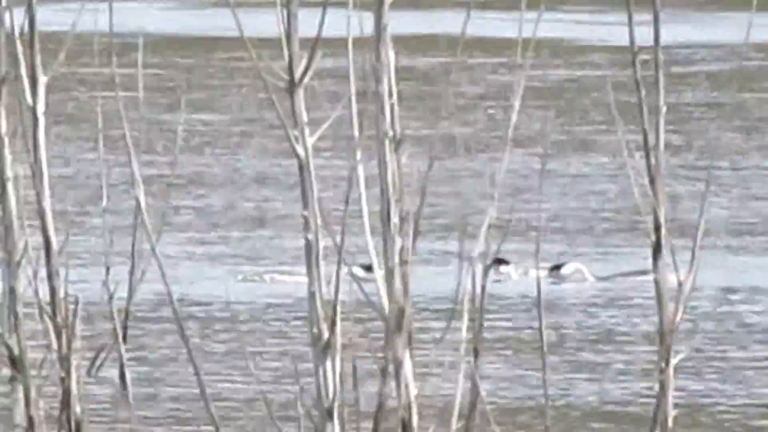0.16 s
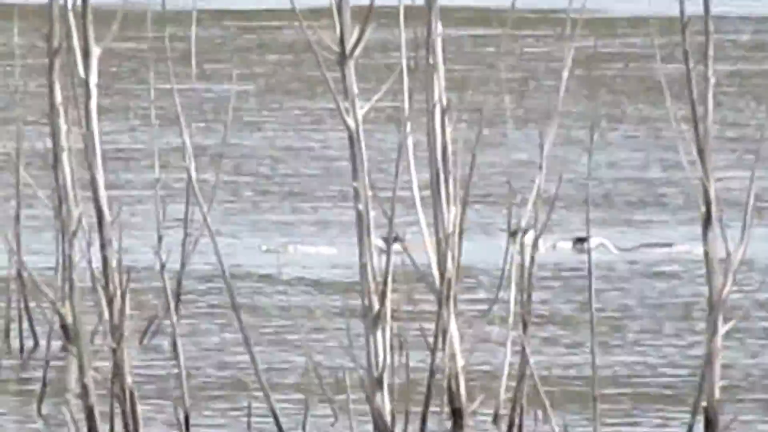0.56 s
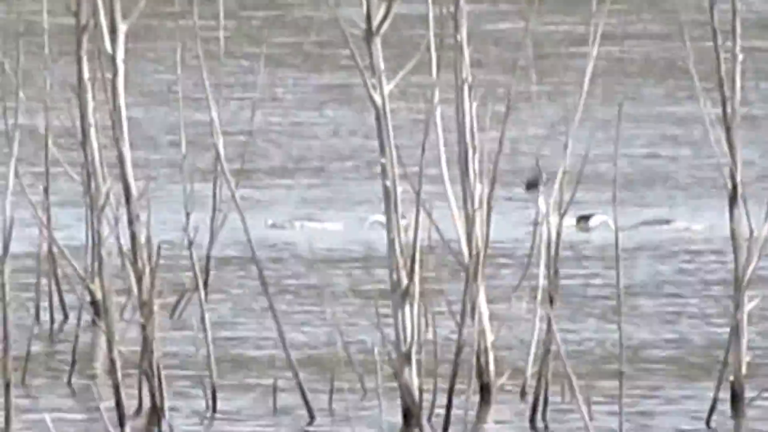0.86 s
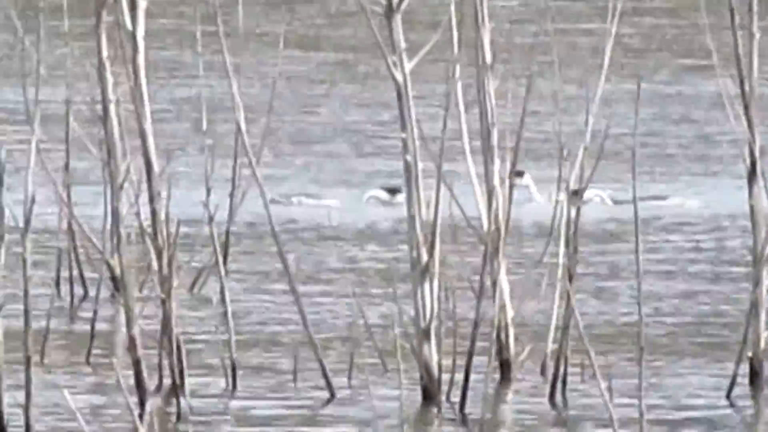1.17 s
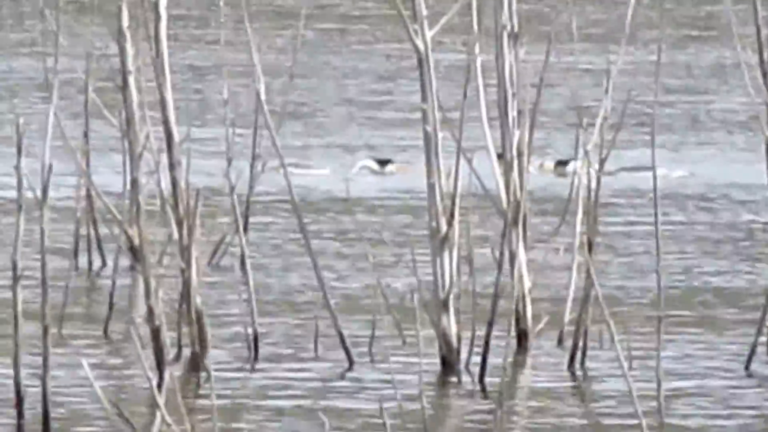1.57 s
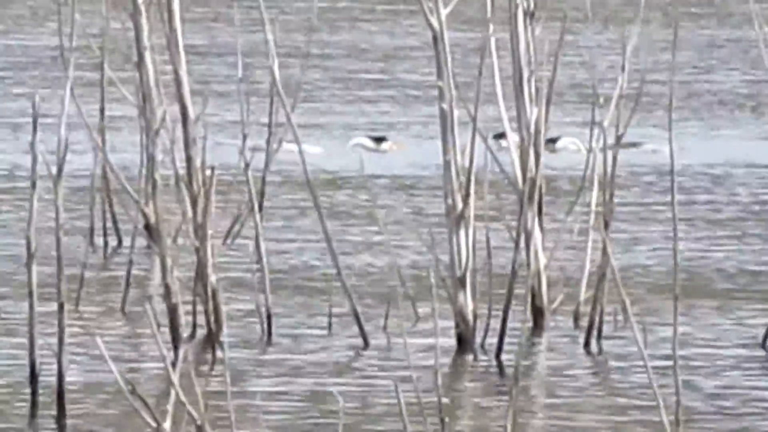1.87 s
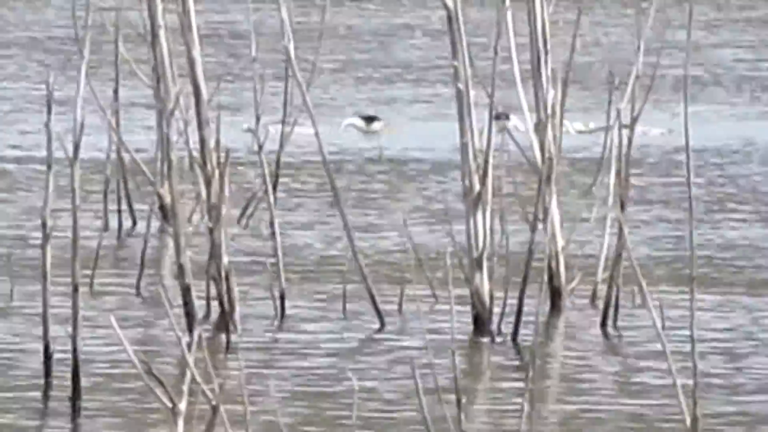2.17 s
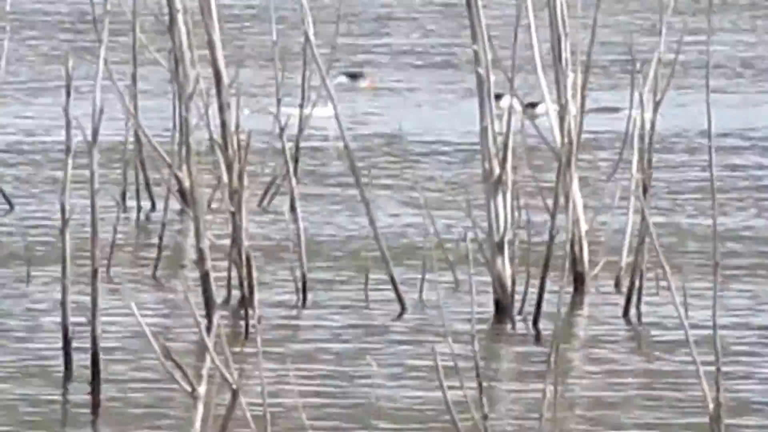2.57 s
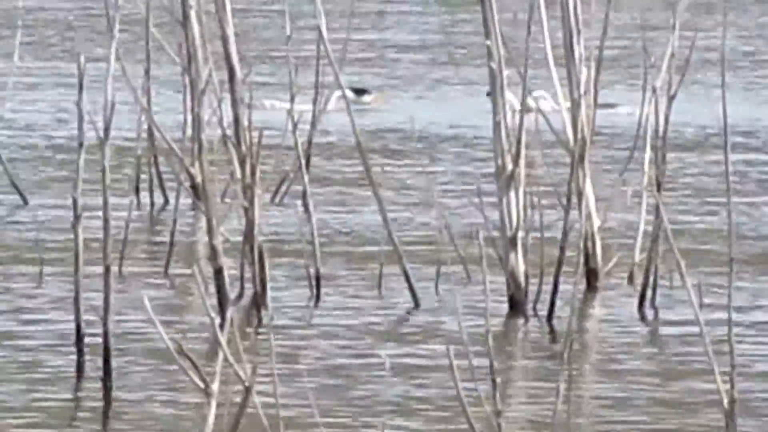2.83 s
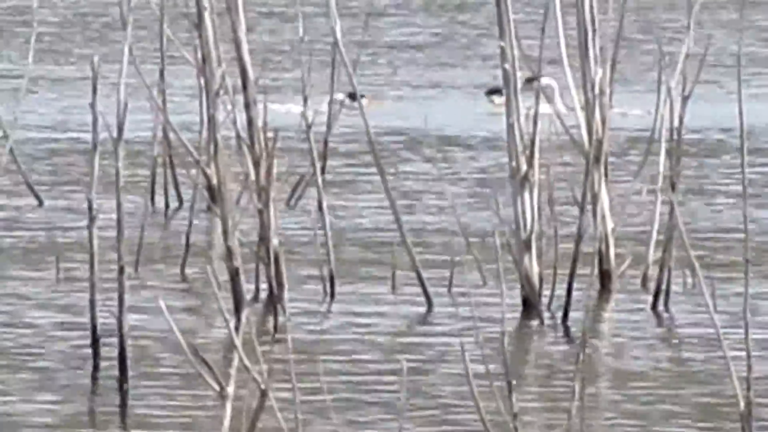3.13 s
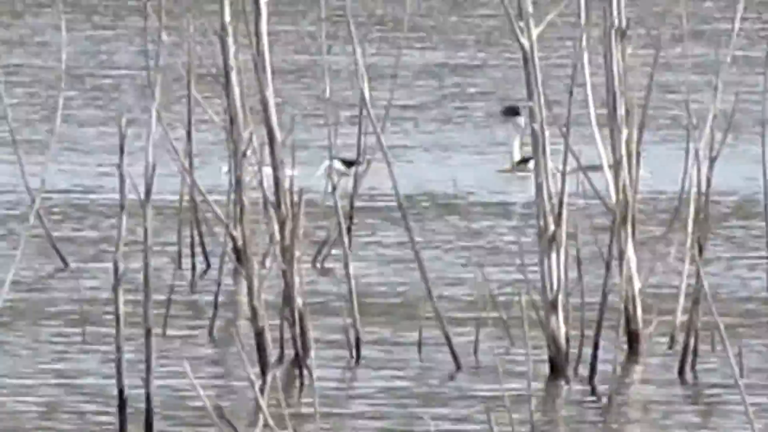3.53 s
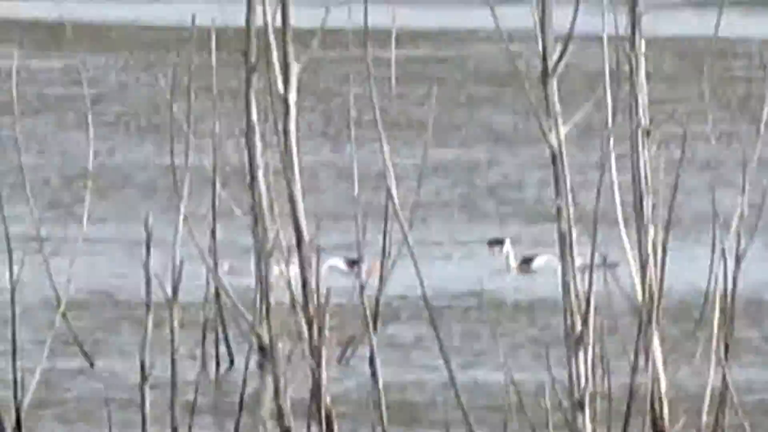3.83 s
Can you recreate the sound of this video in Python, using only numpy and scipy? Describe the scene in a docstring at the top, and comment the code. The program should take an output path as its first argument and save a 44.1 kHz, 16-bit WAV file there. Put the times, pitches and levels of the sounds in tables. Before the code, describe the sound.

Grebes chip and rattle at a middling-high pitch, sparse at first, quickening from 0.5 to 1.1 seconds with a faint hoarse hiss near 1. Calls thin, then trills and short whistles crowd 1.5-2.5. Almost quiet from 2.75 to 3.15, they return louder and drier to the end, with two tiny plinks near 3.6. Low wind buffets the microphone heavily until about 2, then eases over faint outdoor wash.

```python
"""Grebes trill and rattle on open water: very short chips near 2.5 kHz, some drawn out into rasps,
with upward sweeps and held, fluttering whistles. Each note is a bending tone; filtered noise makes chips hoarse.
A faint breathy hiss of hoarse, rasping calls, made of patchy noise, swells near one second; two sharp plinks ring.
Wind is lumpy low noise plus single swings of pressure; it eases, then picks up a little at the end.
A faint outdoor wash of steady, patchy noise lies under it all."""
import sys
import numpy as np
from scipy import signal
from scipy.io import wavfile
from scipy.ndimage import uniform_filter1d

SR = 44100
rng = np.random.default_rng(int(sys.argv[2]) if len(sys.argv) > 2 else 0)


def bounce(signal):
    """Save signal as a 16-bit WAV file at the path given by the first command-line argument."""
    frames = np.transpose(np.atleast_2d(signal))
    limited = np.clip(frames, -1, 1)
    pcm = np.round(limited * 32767).astype(np.int16)
    wavfile.write(sys.argv[1], SR, pcm)


N = 176400  # samples: 4 seconds


def amp(db):
    """Turns decibels into gain."""
    return 10 ** (np.asarray(db) / 20)


def unit(x):
    """Scales a sound to an average (rms) level of 1."""
    return x / np.sqrt(np.mean(x ** 2) + 1e-20)


def add(mix, start_s, sound):
    """Mixes a sound in at its start time, cutting off what runs past the end."""
    part = mix[max(round(start_s * SR), 0):][:len(sound)]
    part += sound[:len(part)]


def level(points):
    """Draws a gain curve over the whole scene through (time_s, level_db) points."""
    return amp(np.interp(np.arange(N) / SR, *np.transpose(points)))


def wander(size, hz):
    """Joins random values, hz of them a second, by straight lines."""
    return np.interp(np.arange(size) * hz / SR, np.arange(4096), rng.standard_normal(4096))


def fade(t, length, rise, fall):
    """Shapes a smooth attack, hold and release."""
    attack = np.sin(np.pi / 2 * np.clip(t / rise, 0, 1))
    release = np.sin(np.pi / 2 * np.clip((length - t) / fall, 0, 1))
    return attack * release


def noise(colour, patch_db, size):
    """Makes noise of a given spectrum, with random louder and softer patches in time and pitch."""
    hz = np.fft.rfftfreq(size, 1 / SR)
    real, imaginary, patches = rng.standard_normal((3, len(hz), N * 4 // size + 6))
    colour_hz, colour_db = np.transpose(colour)
    spectrum_db = np.interp(np.log(hz + 1), np.log(colour_hz), colour_db)
    # blur the random grid over 4 neighbouring pitches and 6 neighbouring moments
    patches = uniform_filter1d(uniform_filter1d(patches, size=4, axis=0), size=6, axis=1)
    gain = amp(spectrum_db[:, None] + patch_db * unit(patches))
    sound = signal.istft((real + 1j * imaginary) * gain, nperseg=size, noverlap=size - size // 4)[1]
    return unit(sound[:N])


CHIP_DB, OVERTONE_DB, THIRD_DB = 1.5, -4.5, -39  # the first two are added to the table levels
RISE_S, FALL_S, ARCH_HZ = 0.0012, 0.004, 147  # the pitch arches up and back
RASP_FROM_S, RASP_FULL_S = 0.0026, 0.0092  # note lengths where rasping starts and is full
RASP_DEPTH, RASP_BASE_HZ, RASP_SWING_HZ = 0.55, 299, 76.4  # depth is a share of the loudness
JITTER, JITTER_HZ = 0.048, 514  # typical pitch error as a share of the pitch; new values a second
HOARSE_DB, HOARSE_BAND_HZ = -10, (1960, 4340)  # added to the overtone level in the table


def chip(length, hz, db, overtone_db, climb_hz=0, swell_db=0):
    """Sings an arched, hoarse note with overtones; longer ones rasp, and it may climb and swell."""
    span = length + RISE_S / 2
    t = np.arange(0, span, 1 / SR)

    rasp = np.clip((length - RASP_FROM_S) / (RASP_FULL_S - RASP_FROM_S), 0, 1)
    rasp_hz = RASP_BASE_HZ * rng.uniform(0.99, 1.23)
    flutter = rasp * np.cos(2 * np.pi * (rasp_hz * t + rng.random()))
    shape = fade(t, span, RISE_S, FALL_S) * (1 + RASP_DEPTH * flutter) * amp(swell_db * t / span)

    bend = ARCH_HZ * np.sin(np.pi * t / span) + climb_hz * t / span
    bend += RASP_SWING_HZ * flutter + hz * JITTER * wander(len(t), JITTER_HZ)
    bend -= np.average(bend, weights=shape ** 2)  # hz stays the average pitch, loud parts counting most
    phase = 2 * np.pi * np.cumsum(hz + bend) / SR

    tone = np.sin(phase) + amp(THIRD_DB) * np.sin(3 * phase)
    tone += amp(overtone_db + OVERTONE_DB) * np.sin(2 * phase)
    band = signal.butter(2, HOARSE_BAND_HZ, "band", fs=SR, output="sos")
    hoarse = unit(signal.sosfilt(band, rng.standard_normal(len(t))))
    return amp(db + CHIP_DB) * unit(shape * (tone + amp(overtone_db + HOARSE_DB) * hoarse))


FLUTTER_HZ, LOWER_BAND_DB, WHISTLE_EDGE_S = 275, -10, 0.0024  # lower sideband relative to the upper
WAVER = 0.0075  # typical pitch error as a share of the pitch


def whistle(points):
    """Holds a note; a fast flutter puts a sideband above it and a weaker one below."""
    time_s, pitch_hz, level_db, sideband_db = np.transpose(points)
    t = np.arange(time_s[0], time_s[-1], 1 / SR)
    hz = np.interp(t, time_s, pitch_hz) * (1 + WAVER * wander(len(t), JITTER_HZ))
    phase = 2 * np.pi * np.cumsum(hz) / SR
    beat = 2 * np.pi * FLUTTER_HZ * t
    sides = np.sin(phase + beat) + amp(LOWER_BAND_DB) * np.sin(phase - beat)
    tone = np.sin(phase) + amp(np.interp(t, time_s, sideband_db)) * sides
    edges = fade(t - time_s[0], time_s[-1] - time_s[0], WHISTLE_EDGE_S, WHISTLE_EDGE_S)
    return np.sqrt(2) * amp(np.interp(t, time_s, level_db)) * edges * tone


# Chips of the trills, levels before the settings above are added; overtone relative to the main tone:
# start_s, length_s, pitch_hz, level_db, overtone_db
TRILL_CHIPS = [(0.022, 0.0022, 2440, -37, -9), (0.039, 0.0027, 2600, -49, -22),
               (0.052, 0.0092, 2386, -43, -7), (0.21, 0.0073, 2500, -40, -9),
               (0.221, 0.0021, 2830, -41.5, -16), (0.5014, 0.0036, 2250, -41, -13),
               (0.5066, 0.014, 2268, -43.5, -16), (0.5944, 0.0023, 2640, -40.5, -24),
               (0.6205, 0.011, 2380, -48.5, -7), (0.6536, 0.0023, 2430, -36, -18),
               (0.6842, 0.0015, 2500, -34.5, -15), (0.7136, 0.0074, 2400, -40.5, -16.5),
               (0.723, 0.006, 2820, -44, -22), (0.751, 0.0034, 2350, -37.5, -12),
               (0.757, 0.0032, 2770, -41, -17), (0.787, 0.017, 2430, -41.5, -11),
               (0.827, 0.01, 2410, -44.5, -14), (0.8376, 0.0088, 2230, -45, -8),
               (0.867, 0.024, 2350, -44.5, -6.5), (0.91, 0.0025, 2630, -43.5, -16),
               (0.923, 0.0018, 2270, -41, -12), (0.928, 0.01, 2255, -46, -7),
               (0.9704, 0.0073, 2650, -44.5, -10), (0.9885, 0.013, 2790, -42.5, -17),
               (1.027, 0.0073, 2170, -45.5, -5), (1.0354, 0.0027, 2180, -40, -8),
               (1.081, 0.0035, 2350, -51, -10), (1.09, 0.006, 2080, -48, -9),
               (1.218, 0.0083, 2360, -46.5, -14), (1.2983, 0.0077, 2410, -41.5, -21),
               (1.378, 0.016, 2530, -49, -25), (1.4646, 0.0023, 2670, -41, -25),
               (1.4973, 0.0024, 2500, -42, -35), (1.5032, 0.0042, 2830, -42.5, -30.5),
               (1.527, 0.0034, 2520, -44, -25), (1.5402, 0.0027, 2770, -42.5, -27),
               (1.561, 0.0081, 2650, -44, -29), (1.5923, 0.0022, 2580, -40.5, -27),
               (1.5987, 0.007, 2920, -44.5, -27), (1.6273, 0.01, 2600, -46, -20),
               (1.6683, 0.0031, 2930, -43.5, -15), (1.696, 0.011, 2220, -46, -21),
               (1.708, 0.0026, 2720, -43, -21), (1.7137, 0.0072, 2350, -41.5, -21),
               (1.867, 0.0089, 2580, -47, -23), (1.878, 0.0051, 2210, -39, -16),
               (1.8847, 0.012, 2265, -42, -18), (1.939, 0.005, 2200, -50.5, -14),
               (2.0005, 0.0033, 2330, -48, -26), (2.049, 0.0054, 2330, -41.5, -20),
               (2.0596, 0.002, 2340, -39, -29), (2.073, 0.017, 2377, -43.5, -10.5),
               (2.089, 0.0061, 2415, -37, -30), (2.0952, 0.012, 2455, -41.5, -33),
               (2.122, 0.0034, 2410, -36, -24), (2.139, 0.0041, 2290, -44, -15),
               (2.1566, 0.0022, 2320, -33, -23), (2.164, 0.013, 2357, -39, -15),
               (2.177, 0.01, 2380, -40, -27), (2.196, 0.005, 2410, -32.5, -18),
               (2.2034, 0.0042, 2680, -36, -22), (2.2105, 0.0071, 2540, -43, -27),
               (2.2295, 0.0022, 2730, -37.5, -14), (2.234, 0.0071, 2600, -40, -13),
               (2.241, 0.01, 2360, -38.5, -19), (2.252, 0.012, 2660, -42, -25),
               (2.266, 0.012, 2364, -43, -13), (2.2807, 0.0062, 2120, -39, -12),
               (2.288, 0.009, 2320, -38.5, -19), (2.3004, 0.013, 2440, -47, -20),
               (2.3501, 0.0017, 2570, -39, -21), (2.375, 0.0032, 2530, -45, -15),
               (2.377, 0.014, 2120, -43.5, -16), (2.4124, 0.011, 2860, -47.5, -28),
               (2.4296, 0.0055, 2150, -40, -15), (2.438, 0.0074, 2100, -45.5, -10),
               (2.4393, 0.0025, 2800, -39.5, -26), (2.4722, 0.0047, 2440, -44, -9),
               (2.479, 0.003, 2850, -39.5, -30), (2.486, 0.0034, 2230, -40, -16),
               (2.5098, 0.0033, 2600, -40.5, -15), (2.5465, 0.0027, 2750, -40.5, -18),
               (2.5864, 0.0014, 2570, -40.5, -19), (2.626, 0.0066, 2220, -46, -13),
               (2.7526, 0.0067, 2780, -45, -19), (3.152, 0.0088, 2410, -47, -11),
               (3.195, 0.0026, 2260, -47, -14), (3.2376, 0.0022, 2660, -40, -31),
               (3.2645, 0.0026, 2540, -44.5, -22), (3.293, 0.0091, 2730, -45.5, -23),
               (3.304, 0.0043, 2470, -38, -13.5), (3.311, 0.011, 2424, -41.5, -11.5),
               (3.3493, 0.002, 2490, -40, -16), (3.389, 0.0024, 2750, -34.5, -19),
               (3.408, 0.0036, 2520, -49, -12), (3.4268, 0.0041, 2710, -36.5, -14),
               (3.4487, 0.0034, 2500, -39.5, -10), (3.4638, 0.0061, 2770, -35.5, -15),
               (3.4715, 0.013, 2350, -47, -27), (3.485, 0.0036, 2480, -44, -12),
               (3.5, 0.003, 2800, -31.5, -13.5), (3.5183, 0.0082, 2630, -37.5, -20),
               (3.5322, 0.0054, 2810, -34.5, -15.5), (3.548, 0.011, 2490, -41, -32),
               (3.5725, 0.0018, 2500, -34, -25), (3.575, 0.016, 2200, -45, -16),
               (3.627, 0.0034, 2750, -36, -18), (3.6377, 0.0034, 2870, -29.5, -20.5),
               (3.6597, 0.0086, 2400, -39, -23), (3.673, 0.0055, 2410, -42, -26),
               (3.6875, 0.0023, 2330, -44, -27), (3.699, 0.0026, 2330, -36.5, -20),
               (3.731, 0.0046, 2240, -38.5, -18), (3.762, 0.0033, 2340, -35.5, -23),
               (3.797, 0.0029, 2320, -33.5, -21), (3.8362, 0.011, 2236, -37.5, -18),
               (3.845, 0.01, 2455, -40.5, -32), (3.873, 0.003, 2400, -40, -30),
               (3.879, 0.01, 2170, -39, -14), (3.8905, 0.0076, 2250, -42, -15),
               (3.9143, 0.015, 2500, -44.5, -32), (3.9285, 0.007, 2170, -39.5, -14.5),
               (3.934, 0.0097, 2140, -41.5, -12), (3.952, 0.0082, 2410, -41.5, -35),
               (3.9793, 0.0055, 2160, -41, -10), (3.987, 0.0079, 2160, -44.5, -16)]
# Notes that sweep upward, with the same first five columns:
# start_s, length_s, pitch_hz, level_db, overtone_db, climb_hz, swell_db
UPWARD_SWEEPS = [(0.0932, 0.013, 2400, -42.5, -10.5, 400, 3), (0.157, 0.0056, 2710, -40.5, -15, 280, 3),
                 (0.2759, 0.014, 2790, -39.5, -11.5, 766, 9), (1.1002, 0.0059, 2840, -41, -12.5, 250, 2),
                 (1.164, 0.013, 2670, -43, -9, 740, 4.5), (2.3264, 0.013, 2650, -38.5, -13.5, 764, 7),
                 (2.3915, 0.01456, 2685, -37.5, -9.5, 800, 7.5), (2.705, 0.0079, 2480, -37, -20.5, 450, -1),
                 (3.556, 0.015, 2620, -37.5, -18, 380, 9), (3.5923, 0.011, 2800, -34, -19, 400, 18)]
# Held whistles, each a list of points; the upper sideband is relative to the main tone:
# time_s, pitch_hz, level_db, sideband_db
HELD_WHISTLES = [
    [(1.631, 2160, -43, -20), (1.642, 2176, -40.5, -22), (1.653, 2170, -49, -20)],
    [(1.677, 2130, -42, -18), (1.688, 2110, -49, -18)],
    [(1.722, 2425, -43.5, -19), (1.762, 2440, -41, -27), (1.775, 2437, -42.5, -1),
     (1.802, 2478, -40.5, -20), (1.824, 2414, -44, 3), (1.841, 2390, -43, -21), (1.856, 2315, -42, -24)],
    [(2.014, 2400, -41.5, -25), (2.032, 2530, -34.5, -16)],
    [(3.432, 2190, -38, -22), (3.448, 2190, -40, -18)],
    [(3.572, 2700, -40, -16), (3.606, 2752, -41, -24), (3.642, 2713, -39.5, -17), (3.654, 2640, -40, -10),
     (3.662, 2520, -45, -10)],
]
LOWEST_HZ = 1877  # the voices fall away steeply below this


def grebes():
    """Gathers the birds' chips, sweeps and whistles and removes the sound below their voices."""
    voices = np.zeros(N)
    for start_s, *note in TRILL_CHIPS + UPWARD_SWEEPS:
        add(voices, start_s, chip(*note))
    for points in HELD_WHISTLES:
        add(voices, points[0][0], whistle(points))
    low_cut = signal.butter(4, LOWEST_HZ, "high", fs=SR, output="sos")
    return signal.sosfiltfilt(low_cut, voices)


# Loudness of the breathy hiss of hoarse, rasping calls: time_s, level_db
CALL_HISS_LEVEL = [(.70, -62.5), (.87, -53.5), (.92, -58), (1.02, -53), (1.12, -61.5), (1.25, -64.5)]
# Colour of the hiss, only relative levels matter: pitch_hz, level_db
CALL_HISS_SPECTRUM = [(500, -16), (2000, 11), (3000, 7), (4000, 0), (5500, 1), (8000, -14), (14000, -23)]
CALL_HISS_PATCH_DB = 2.5
# Faint rising octave overtones of low, hoarse chips, by their middle pitch:
# start_s, length_s, pitch_hz, level_db
RISING_OVERTONES = [(0.976, 0.0097, 3750, -56), (1, 0.012, 3770, -52), (1.055, 0.013, 4040, -58)]
OVERTONE_RISE_HZ_PER_S = 98000


def call_hiss():
    """Shapes patchy noise into the breath of rasping calls and adds quickly rising overtones."""
    out = level(CALL_HISS_LEVEL) * noise(CALL_HISS_SPECTRUM, CALL_HISS_PATCH_DB, size=256)
    for start_s, length, hz, db in RISING_OVERTONES:
        t = np.arange(0, length, 1 / SR)
        phase = 2 * np.pi * np.cumsum(hz + OVERTONE_RISE_HZ_PER_S * (t - length / 2)) / SR
        add(out, start_s, amp(db) * unit(np.sin(np.pi * t / length) * np.sin(phase)))
    return out


def scatter(x, t60):
    """Adds up many small reflections in a noisy tail that dies by 60 dB in t60 seconds."""
    t = np.arange(SR // 2) / SR
    tail = rng.standard_normal(len(t)) * amp(-60 * t / t60) * (t > .0015)  # starts after 1.5 ms
    return signal.fftconvolve(x, tail / np.linalg.norm(tail))[:N]


NEAR_DB, NEAR_T60_S, FAR_DB, FAR_T60_S = -13.5, 0.036, -14.5, 0.14


def echoes(birds):
    """Scatters the voices off the water and the trees, as a short tail and a longer one."""
    return amp(NEAR_DB) * scatter(birds, NEAR_T60_S) + amp(FAR_DB) * scatter(birds, FAR_T60_S)


# Sharp plinks, like drops on the water; the level is the peak of the loudness curve:
# start_s, pitch_hz, peak_db
WATER_PLINKS = [(3.5734, 3380, -30.5), (3.608, 3900, -40)]
PLINK_S = 0.00041  # time to the peak


def plinks():
    """Rings tiny tones that die within a few milliseconds."""
    out = np.zeros(N)
    t = np.arange(0, 20 * PLINK_S, 1 / SR)
    shape = t / PLINK_S * np.exp(1 - t / PLINK_S)
    for start_s, hz, db in WATER_PLINKS:
        add(out, start_s, amp(db) * shape * np.sin(2 * np.pi * hz * t))
    return out


BUFFET_SHAPE = 3.13  # higher values give more swings


def buffet(s, hz, db):
    """Lets an eddy hit the microphone: about one swing of pressure, starting anywhere in its cycle."""
    t = np.arange(-min(s, .05), .05, 1 / SR)
    swing = (1 - 2j * np.pi * hz * t / BUFFET_SHAPE) ** -BUFFET_SHAPE
    pressure = (swing * np.exp(2j * np.pi * rng.random())).real
    return s + t[0], amp(db) * pressure * fade(t - t[0], t[-1] - t[0], .01, .01)


# Wind strength, which scales the rumble and small eddies: time_s, level_db
WIND_STRENGTH = [(0, -25.5), (.55, -29.5), (.9, -25.5), (1.47, -31), (1.85, -24), (2.15, -30), (2.7, -33),
                 (3.15, -40), (3.55, -35.5), (3.85, -32)]
# Colour of the rumble, only relative levels matter: pitch_hz, level_db
RUMBLE_SPECTRUM = [(10, -35), (22, -16), (35, -2.5), (80, -2.5), (130, -3.5), (200, -10.5), (300, -24),
                   (450, -34.5), (800, -68), (2000, -77)]
RUMBLE_DB, LUMPY_DB = -4.5, 2.5  # rumble level before wind strength; typical lump size
EDDIES_PER_S, EDDY_DB, EDDY_HZ = 35, 4, 120  # averages for count and pitch; level before wind strength
# Hard buffets, levels before BUFFET_DB is added: centre_s, centre_hz, peak_db
HARD_BUFFETS = [(0.009, 100, -19.5), (0.082, 167, -15), (0.097, 190, -19.5), (0.109, 165, -20.5),
                (0.221, 110, -16), (0.282, 94, -18.5), (0.308, 167, -22), (0.335, 110, -19),
                (0.36, 158, -16.5), (0.394, 121, -16), (0.419, 110, -17.5), (0.449, 89, -16.5),
                (0.602, 150, -18.5), (0.623, 160, -20.5), (0.661, 100, -20.5), (0.731, 93, -15.5),
                (0.781, 164, -13.5), (0.834, 154, -14), (0.859, 117, -16.5), (0.876, 137, -13.5),
                (0.912, 106, -16.5), (0.938, 160, -23), (0.965, 146, -15), (1.057, 121, -20),
                (1.097, 105, -13.5), (1.131, 108, -17.5), (1.154, 129, -16.5), (1.18, 125, -14.5),
                (1.211, 150, -16.5), (1.222, 144, -13), (1.339, 116, -20.5), (1.582, 118, -16),
                (1.61, 172, -20), (1.661, 110, -12), (1.687, 129, -14.5), (1.697, 119, -16),
                (1.747, 262, -13), (1.811, 130, -12.5), (1.848, 150, -20.5), (1.866, 148, -15),
                (1.882, 168, -18.5), (1.906, 172, -14), (1.927, 118, -16), (2.062, 102, -18),
                (2.299, 87, -21.5), (2.318, 85, -22), (2.381, 157, -19.5), (2.435, 104, -20.5),
                (2.488, 113, -21), (2.554, 109, -15.5), (2.682, 90.5, -16.5), (2.74, 139, -20.5),
                (2.862, 87.5, -23), (2.895, 98, -21.5), (3.118, 108, -22.5), (3.78, 128, -19.5)]
BUFFET_DB = 1.9


def wind():
    """Makes lumpy rumble and small eddies follow the wind's strength; hard buffets stand out."""
    rumble = noise(RUMBLE_SPECTRUM, 0.7, size=4096) * amp(LUMPY_DB * wander(N, 40))
    out = amp(RUMBLE_DB) * unit(rumble)
    for place, luck, pitch in rng.random((600, 3)):
        if luck < EDDIES_PER_S * N / SR / 600:  # keep only some of the 600 chances
            eddy_hz = EDDY_HZ * 2 ** (pitch - .5)  # up to half an octave either way
            add(out, *buffet(place * N / SR, eddy_hz, EDDY_DB))
    out *= level(WIND_STRENGTH)
    for centre_s, hz, db in HARD_BUFFETS:
        add(out, *buffet(centre_s, hz, db + BUFFET_DB))
    return out


# Colour of the outdoor wash, only relative levels matter: pitch_hz, level_db
WASH_SPECTRUM = [(20, 17), (90, 15), (240, 12), (285, 17.5), (340, 8.5), (600, 0.5), (780, 0), (890, 2),
                 (1020, -2.5), (1140, 3), (1400, -6), (1900, -12.5), (3300, -21.5), (5000, -18),
                 (7300, -16.5), (10000, -19.5), (15000, -26.5)]
WASH_DB, WASH_PATCH_DB = -45.5, 2


def wash():
    """Spreads faint, patchy noise under the whole scene."""
    return amp(WASH_DB) * noise(WASH_SPECTRUM, WASH_PATCH_DB, size=1024)


def scene():
    """Sets birds across the water, with wind at the microphone."""
    birds = grebes()
    mix = birds + call_hiss() + echoes(birds) + plinks() + wind() + wash()
    return mix[None]


EDGE_HZ = 15120


def record(dry):
    """Limits the band as the recorder does: the sound above EDGE_HZ is filtered away."""
    low_pass = signal.firwin(511, EDGE_HZ, window=("kaiser", 9), fs=SR)
    return signal.oaconvolve(dry, low_pass[None], "same")


dry = scene()
out = record(dry)
bounce(out)
```